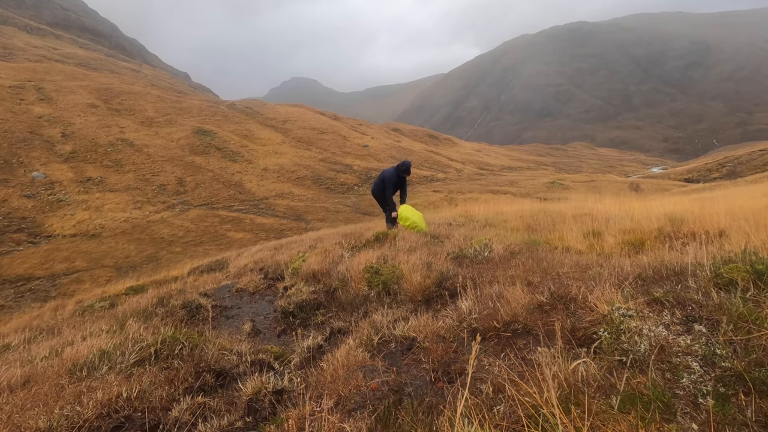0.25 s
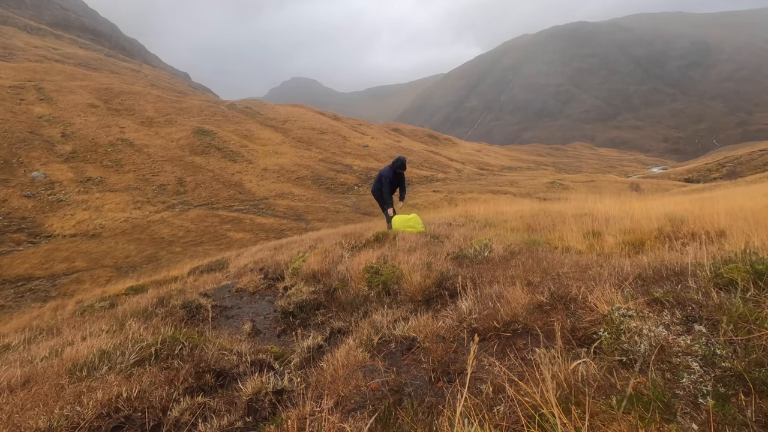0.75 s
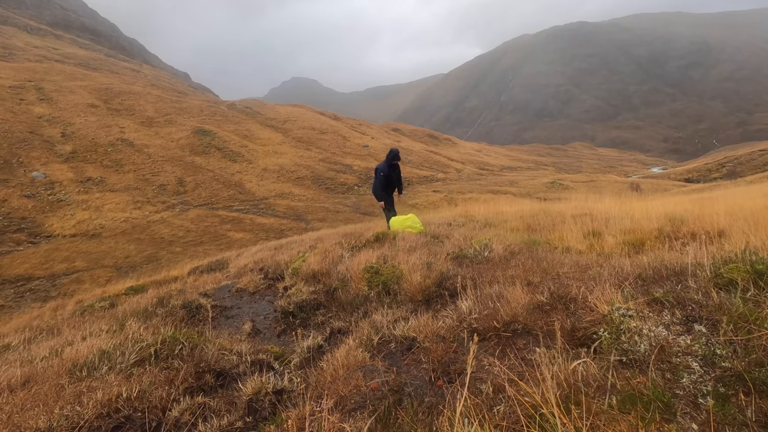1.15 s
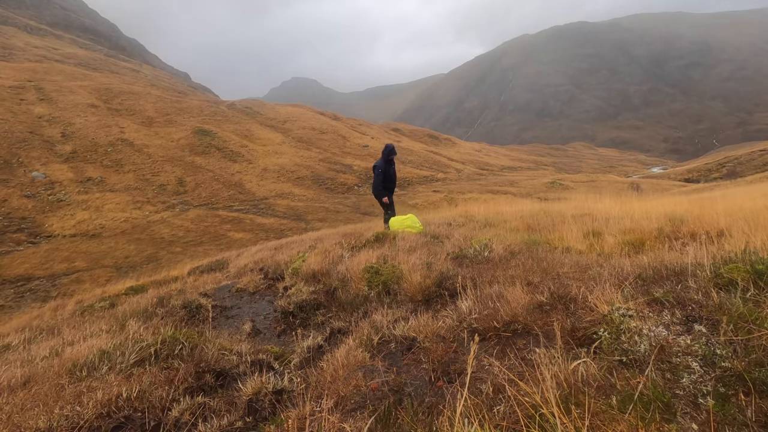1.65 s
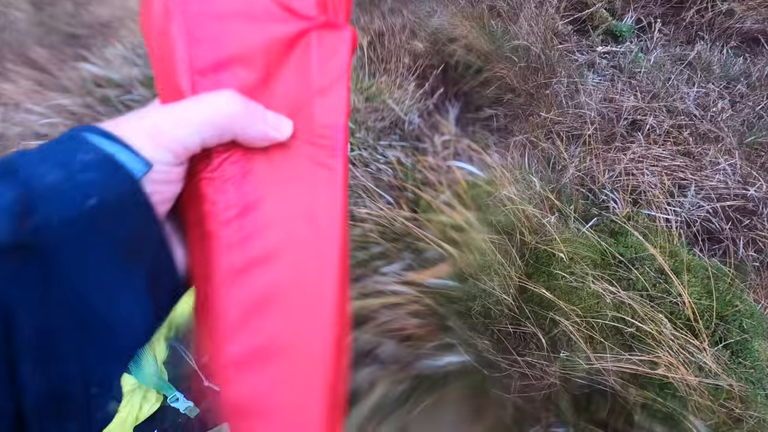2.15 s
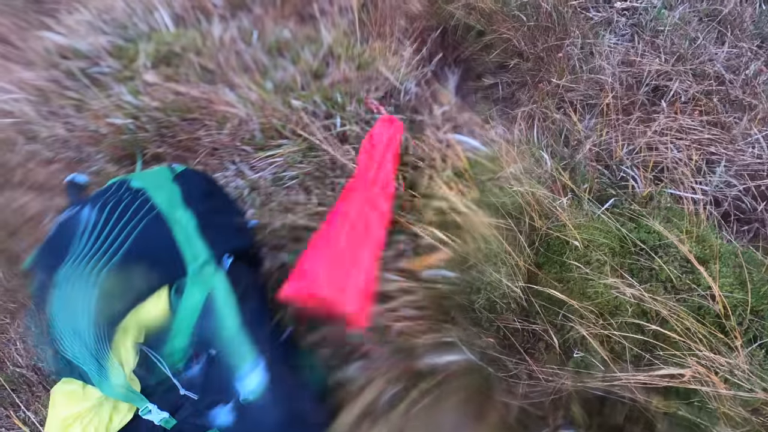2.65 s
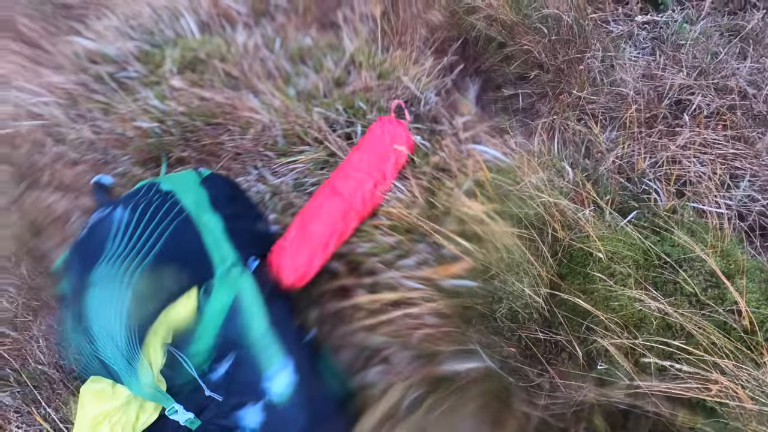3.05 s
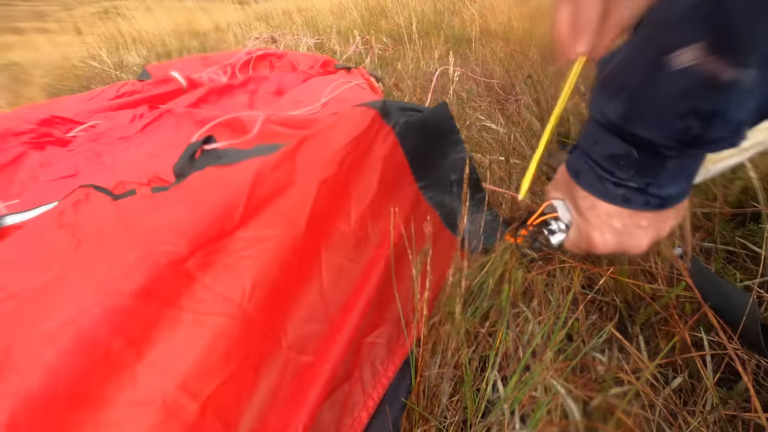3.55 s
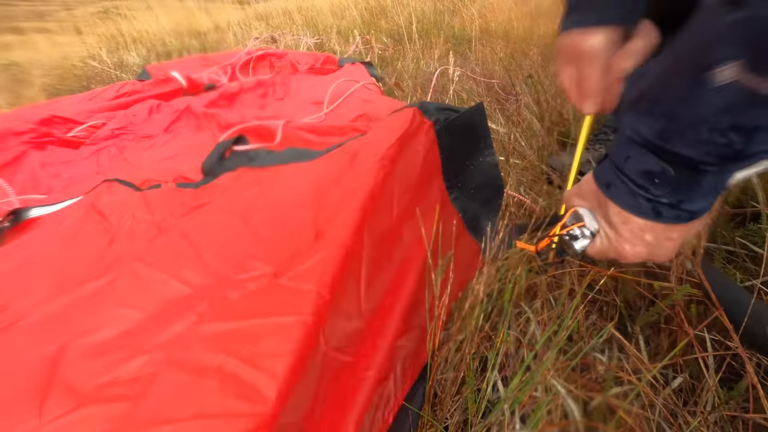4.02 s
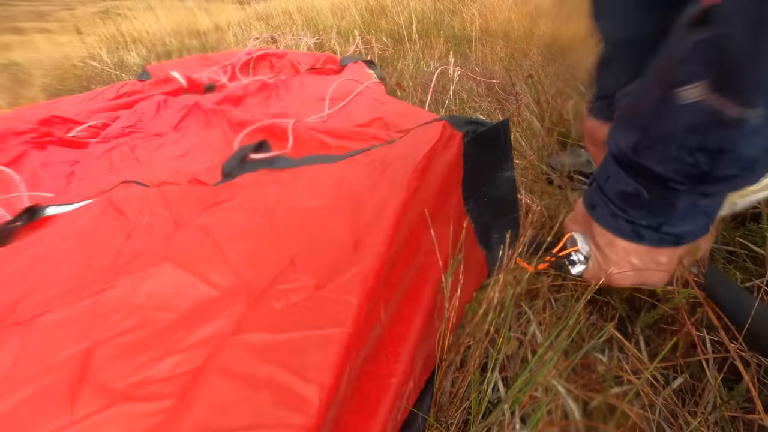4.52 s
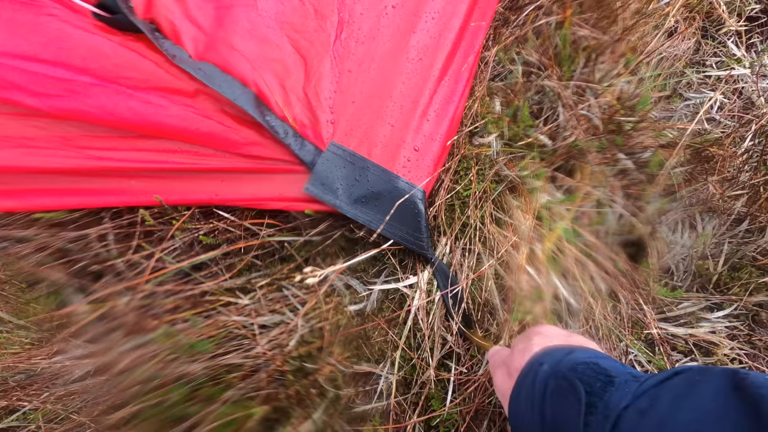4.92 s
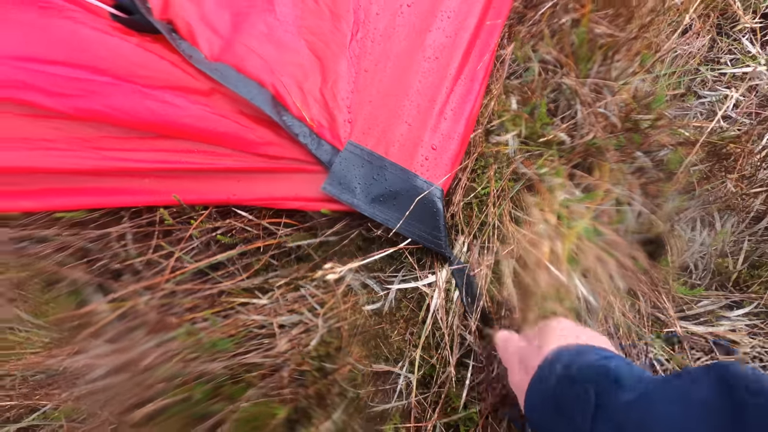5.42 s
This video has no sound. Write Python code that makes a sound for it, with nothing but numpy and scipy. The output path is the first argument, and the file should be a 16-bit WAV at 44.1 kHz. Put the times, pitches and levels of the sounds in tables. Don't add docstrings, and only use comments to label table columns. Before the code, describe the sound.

Gusty wind rumbles against the microphone on an open grassy hillside, then a pole bag drops with a crackling clatter and nylon fabric flaps and snaps.

```python
import sys
import numpy as np
from scipy import signal
from scipy.fft import rfft, irfft, next_fast_len
from scipy.io import wavfile
from scipy.ndimage import uniform_filter1d

SR = 44100
rng = np.random.default_rng(int(sys.argv[2]) if len(sys.argv) > 2 else 0)


def boost(x):
    u = np.asarray(x, float) / 20
    return 10 ** u


def output_pcm(signal):
    pcm = np.clip(np.atleast_2d(signal).T, -1, 1) * 32767
    wavfile.write(sys.argv[1], SR, np.round(pcm).astype(np.int16))


N = 250047
GRASSLAND, BAG_PLACE, SHEET_PLACE, HEM_PLACE = range(4)


def rms_one(x):
    return x / np.sqrt(np.mean(x ** 2) + 1e-20)


def colour(x, *spectra):
    size = next_fast_len(x.shape[-1] + 8192)
    log_hz = np.log(np.maximum(np.arange(size // 2 + 1) * SR / size, 1))
    level_db = 0
    for spectrum in spectra:
        hz, db = np.transpose(spectrum)
        level_db = level_db + np.interp(log_hz, np.log(hz), db)
    cepstrum = irfft(np.log(boost(level_db)), size)
    cepstrum[1:size // 2] *= 2
    cepstrum[size // 2 + 1:] = 0
    response = np.exp(rfft(cepstrum))
    return irfft(rfft(x, size) * response, size)[..., :x.shape[-1]]


def drift(size, rate_hz):
    r, run_in = np.exp(-2 * np.pi * rate_hz / SR), SR // 4
    noise = rng.standard_normal(size + run_in)
    return rms_one(signal.lfilter([1], [1, -2 * r, r * r], noise)[run_in:])


def ring(clicks, hz, t60):
    r, w = boost(-60 / (t60 * SR)), 2 * np.pi * min(hz, .45 * SR) / SR
    return signal.lfilter([0, np.sin(w)], [1, -2 * r * np.cos(w), r * r], clicks + 1e-18)


def even(x, seconds):
    power = uniform_filter1d(np.mean(x, axis=0) ** 2, int(seconds * SR))
    return x / np.sqrt(power + .05)


# f/Hz, level/dB
WIDE = [(60, -5), (130, -42), (290, -15.5), (640, -11), (1410, -9.5), (3100, -8), (6820, -0.5), (15000, 2)]
# f/Hz, level/dB
NARROW = [(60, -90), (1500, -52), (4000, -41), (6000, -24), (10000, -19), (11000, -45)]
WIDTHS = [NARROW, NARROW, WIDE, NARROW]


def stereo(pair, spectrum, width):
    mid, side = colour(pair[0], spectrum), colour(pair[1], spectrum, width)
    return np.array([mid + side, mid - side]) / np.sqrt(np.mean(mid ** 2))


# t/s, thump level/dB, roar level/dB
EDDIES = [(0.04, 11.5, -0.5), (0.19, 3.5, 2), (0.28, 4.5, -0.5), (0.38, 7.5, 2), (0.62, 3, -1),
          (0.77, 4.5, -1), (0.92, -1, -2.5), (1.1, 3.5, -0.5), (1.27, 11.5, 0.5), (1.55, 13, -0.5),
          (1.86, 11.5, 1.5), (2.05, -13, 0), (2.23, 0, 2.5), (2.33, -1, 2.5), (2.42, -3, 5), (2.52, -1, 1),
          (2.65, -19, 4.5), (3.12, 15, -2), (3.29, 7.5, 0), (3.6, -1, 2.5), (3.82, 5.5, 0), (3.92, 2, 1.5),
          (4.0, 8.5, 1), (4.12, 1.5, -0.5), (4.3, -6, 1), (4.57, 7.5, 0.5), (4.79, 3.5, 2), (5.02, 9, 5.5),
          (5.1, 1.5, 0.5), (5.18, 10.5, 4.5), (5.3, -2, 0.5), (5.4, 4, 3), (5.53, 8.5, 2.5)]


def eddies(t):
    s, thump_db, roar_db = np.transpose(EDDIES)
    half_length_s, coarse = 0.044, t[::64]
    bells = np.exp(-((coarse[:, None] - s) / half_length_s) ** 2 / 2)
    return np.interp(t, coarse, bells @ thump_db), np.interp(t, coarse, bells @ roar_db)


# f/Hz, level/dB per Hz
BUFFET = [(7.1, -52), (12, 6.5), (38, 6.5), (110, -11.5), (140, -15), (240, -120)]
# f/Hz, level/dB per Hz
ROAR = [
    [(35, -44), (60, -3.5), (113, -7), (161, -5.5), (385, -15), (900, -29.5), (1170, -83), (1980, -120)],
    [(35, -35), (60, 1.5), (188, -4.5), (307, -14.5), (380, -16), (900, -25), (1170, -48), (1980, -120)],
    [(35, -19), (60, 0.5), (178, -6.5), (317, -15.5), (461, -26), (900, -30), (1170, -37), (1980, -120)],
    [(35, -12.5), (60, -17.5), (91, -7.5), (585, -27), (709, -42), (900, -37), (1170, -48), (1980, -120)],
]
# buffeting level/dB, roar level/dB, dull hiss level/dB, sharp hiss level/dB
CALM = [
    (-40, -39.5, -43.5, -54.5),
    (-42.5, -37.5, -47, -56.5),
    (-37, -36.5, -44, -48),
    (-31, -38.5, -43, -54.5),
]


def wind(t, place):
    thump_db, surge_db = eddies(t)
    buffet_db, roar_db = CALM[place][:2]
    run_in = SR // 4
    low, high = rng.standard_normal((2, 2, len(t) + run_in))
    buffet = even(stereo(low, BUFFET, WIDTHS[place]), 0.25)[:, run_in:]
    roar = even(stereo(high, ROAR[place], WIDTHS[place]), 0.0635)[:, run_in:]
    deep = signal.sosfiltfilt(signal.butter(1, 150, fs=SR, output="sos"), roar)
    roar = roar + deep * (boost(0.32 * thump_db - 1.0) - 1)
    return boost(buffet_db + thump_db) * buffet + boost(roar_db + surge_db + 5.5) * roar


# start t/s, hold t/s, sharp level/dB, dull level/dB
CRUMPLES = [(2.185, 0.074, -57, -44), (2.293, 0.066, -45, -41), (2.395, 0.035, -42.5, -40.5),
            (2.577, 0.017, -44, -43), (2.612, .008, -38, -37), (2.616, 0.014, -30, -29),
            (2.666, 0.011, -27, -55), (2.722, 0.011, -42, -60), (2.758, 0.013, -39.5, -42.5),
            (2.83, 0.021, -50, -51), (2.9, 0.05, -39, -42.5), (2.952, 0.015, -25.5, -48),
            (3.018, 0.013, -37.5, -47), (3.056, 0.026, -48.5, -60), (3.11, 0.016, -53, -62),
            (3.243, .03, -54, -48), (3.294, 0.063, -42.5, -39), (3.397, 0.16, -43.5, -39.5),
            (3.589, 0.098, -45, -41.5), (3.72, 0.043, -54, -49), (3.785, 0.074, -45, -41),
            (4.076, 0.11, -55, -46), (4.225, 0.18, -50.5, -47.5), (4.414, 0.066, -47, -43.5),
            (4.715, .04, -48, -61), (4.78, 0.24, -47.5, -44.5), (4.998, 0.086, -49, -40.5),
            (5.137, 0.1, -55.5, -48), (5.247, 0.094, -49, -44.5), (5.39, 0.12, -50.5, -40.5),
            (5.55, 0.15, -55, -51)]


def crumpling(t):
    swell_db_per_s, fade_db_per_s = 523, 324
    power = np.zeros((2, len(t)))
    for s, hold_s, sharp_db, dull_db in CRUMPLES:
        if t[0] <= s <= t[-1]:
            swell_db = np.minimum(swell_db_per_s * (t - s), 0)
            fade_db = fade_db_per_s * np.maximum(t - s - hold_s, 0)
            power += boost(2 * (swell_db - fade_db + np.array([[dull_db], [sharp_db]])))
    return np.sqrt(power)


def grain(clicks, hz):
    click = np.arange(400) == 0
    shape = ring(ring(click, hz, 3.0 / hz), hz, 3.0 / hz)
    shape = shape * np.sqrt(hz / np.sum(shape ** 2))
    return signal.oaconvolve(clicks, [shape])[:, :clicks.shape[1]]


# f/Hz, level/dB per Hz
GRASS = [(290, -12), (500, -12.5), (594, -20.5), (839, -16.5), (914, -17.5), (1010, -14), (1800, -15.5),
         (2570, -19.5), (2800, -20), (4070, -19), (7450, -36.5), (8480, -35.5), (12900, -56), (14200, -68)]
# f/Hz, level/dB per Hz
BAG = [(290, -37), (500, -17.5), (1120, -7.5), (1370, -9), (2500, -2), (3200, -3), (3590, 2.5), (4850, -1),
       (8300, -10), (9800, -17.5), (12200, -22), (15600, -43)]
# f/Hz, level/dB per Hz
TENT = [(290, -41.5), (500, 0), (569, -5), (612, -1), (851, -5), (955, 0), (1470, 2), (3200, -2),
        (7690, -16.5), (12400, -34), (15600, -54)]
# f/Hz, level/dB per Hz
HEM = [(290, -34), (500, -22), (706, -1.5), (915, -8), (1540, -5.5), (2430, -11), (2810, -9.5),
       (3800, -12.5), (6110, -13.5), (12500, -32.5), (15600, -52)]
# crackle rate/(1/s), crackle share level/dB, size spread/dB, flutter/dB,
# split of dull and sharp f/Hz
GRAIN = [
    (20, -30, 23, 0.2, 2910),
    (2000, -7.5, 1, 0, 1500),
    (918, -7, 4, 2.16, 3030),
    (1000, -7.5, 5.5, 2, 2820),
]
# f/Hz, level/dB
TOP_SIDE = [(10000, -45), (11500, -14), (13000, -2), (15000, -13)]
# f/Hz, level/dB
BAG_TOP_LEAN = [(9500, 0), (11000, -7), (15000, -9)]


def rustle(t, place):
    size, width, spectrum = len(t), WIDTHS[place], [GRASS, BAG, TENT, HEM][place]
    easing_db = 0.9 * (1 - t) * (place == GRASSLAND)
    calm_gain = boost(np.array(CALM[place][2:])[:, None] + easing_db)
    dull, sharp = np.hypot(calm_gain, crumpling(t))
    per_s, share_db, spread_db, flutter_db, split_hz = GRAIN[place]

    shared = drift(size, 16.0)
    born = rng.random(size) < per_s * boost(3.5 * shared) / SR
    heights = boost(spread_db * np.minimum(rng.exponential(1, size), 2.3))
    clicks = born * heights * rng.choice([-1, 1], size)
    clicks = clicks * np.array([np.ones(size), rng.standard_normal(size)])
    pitches, dealt = np.geomspace(800, 14000, 14), rng.integers(0, 14, size)
    crackle = sum(grain(clicks * (dealt == k), hz) * min(1, 3000 / hz) for k, hz in enumerate(pitches))

    hiss = rng.standard_normal((2, size))
    if place != SHEET_PLACE:
        crackle[1] *= 0
        hiss[1] *= drift(size, 4.) > .4
    sound = stereo(hiss + boost(share_db) * rms_one(crackle), spectrum, width)
    if place != SHEET_PLACE:
        sound += stereo([hiss[0], rng.standard_normal(size)], spectrum, TOP_SIDE)
        sound -= stereo([hiss[0], 0 * t], spectrum, TOP_SIDE)

    out = 0
    for kind, gain in ("low", dull), ("high", sharp):
        part = signal.sosfilt(signal.butter(3, split_hz, kind, fs=SR, output="sos"), sound)
        flutter = boost(flutter_db * (0.056 * shared + drift(size, 81.0)))
        out = out + gain * rms_one(even(rms_one(flutter * part), 0.077))
    if place == BAG_PLACE:
        out[0] = colour(out[0], BAG_TOP_LEAN)
    return out


# t/s, peak level/dB
TICKS = [
    (0.5044, -60),
    (0.7664, -60),
    (0.8829, -49),
    (2.1695, -46),
    (3.2385, -50),
]


def ticks():
    out = np.zeros(N)
    for s, peak_db in TICKS:
        out[round(s * SR)] = boost(peak_db + 13.0)
    return signal.sosfilt(signal.butter(2, [5000, 14000], "band", fs=SR, output="sos"), out)


def burst(decay_s, spectrum, treble_db):
    age = np.arange(2000) / SR / decay_s
    puff = rng.standard_normal(2000) * (1 - np.exp(-age / 0.23)) * np.exp(-age)
    tilt = [(1300, -.6 * max(treble_db, 0)), (2500, 0.004), (4500, 0), (8000, treble_db)]
    puff = colour(puff, spectrum, tilt)
    return puff / np.abs(puff).max()


# f/Hz, level/dB, decay t60/s
POLES = [(1120, -27, 0.05), (1730, -21, 0.14), (2450, -6, 0.066), (3604, 2.5, 0.02), (4250, -6, 0.023),
         (4610, 1, 0.024), (5030, 1.5, 0.035), (5760, -8, 0.037), (6500, -13, .04), (8260, -4.5, 0.038)]


def knocks(rows, jostling):
    s, peak_db, favoured_hz, treble_db = np.transpose(rows)
    at, out = np.round(s * SR).astype(int), jostling.copy()
    strengths_db = rng.normal(0, 3.8, (len(at), len(POLES)))
    for k, (hz, level_db, t60) in enumerate(POLES):
        near_db = 12.8 * np.exp(-(np.log(hz / favoured_hz) / 0.074) ** 2)
        clicks = np.zeros(N)
        clicks[at] = boost(peak_db + level_db + near_db - 22.5 + strengths_db[:, k])
        out += ring(clicks, hz, t60)
    out = signal.sosfilt(signal.butter(3, 8500, fs=SR, output="sos"), out)
    crush_s = 0.7 * 0.0058
    for i, knock_db, cloth_db in zip(at, peak_db, treble_db):
        crush_db = knock_db - 3.5 + .4 * min(cloth_db + 25.0, 0)
        out[i:i + 2000] += boost(crush_db) * burst(crush_s, BAG, cloth_db + 19.5)
    return out


def rattle():
    a, b = (round(s * SR) for s in CUTS_S[1:3])
    effort = np.zeros(N)
    effort[a:b] = crumpling(np.arange(a, b) / SR)[1]
    born = rng.random(N) < 700 / SR
    sizes = born * effort * boost(2.6 * np.minimum(rng.exponential(1, N), 2))
    dealt = rng.integers(0, len(POLES), N)
    out = np.zeros(N)
    for k, (hz, level_db, t60) in enumerate(POLES):
        out += boost(level_db - 6.0) * ring(sizes * (dealt == k), hz, 0.39 * t60)
    return out


# t/s, peak level/dB, favoured f/Hz, cloth treble level/dB
KNOCKS = [(2.2742, -25, 2490, -30), (2.3157, -19, 3600, -31), (2.354, -30, 2360, -14),
          (2.3977, -15.5, 3600, -24.5), (2.4225, -29, 3450, -28), (2.6118, -11, 3880, -17),
          (2.6222, -4.5, 4640, -16.5), (2.6355, -8, 4800, -20), (2.6497, -5.5, 5740, -18),
          (2.6709, -8.5, 4580, -21), (2.692, -24, 4980, -9), (2.7417, -18.5, 3590, -21),
          (2.756, -23, 2440, -26), (2.766, -20, 2450, -23), (2.8046, -26.5, 4780, -30),
          (2.848, -30.5, 3580, -25), (2.9002, -28, 4730, -18), (2.9073, -20.5, 4800, -17),
          (2.9502, -8.5, 4600, -11), (2.9523, -8, 3670, -17), (2.9679, -6, 3870, -9),
          (3.0158, -13.5, 4210, -16), (3.072, -27, 5200, -26), (3.1008, -24.5, 8260, -16),
          (3.1188, -29, 3780, -27), (3.1312, -27, 4700, -24)]
# t/s, peak level/dB, favoured f/Hz, cloth treble level/dB
MORE_KNOCKS = [(2.6185, -14, 5030, -9), (2.627, -15, 2450, -14), (2.631, -9, 8260, -18),
               (2.6385, -12, 4250, -18), (2.6745, -19, 2450, -16), (2.76, -26, 1120, -24),
               (2.642, -16, 3604, -19), (2.658, -20, 4610, -17), (2.68, -25, 3604, -14),
               (2.701, -30, 5030, -19), (2.726, -25, 4610, -16), (2.887, -31, 2450, -16),
               (2.921, -26, 4610, -25), (2.934, -17, 2450, -25), (2.939, -18, 1730, -20),
               (2.957, -18, 3604, -11), (2.982, -21, 4250, -13), (2.992, -26, 3604, -18),
               (3.01, -18, 5760, -16), (3.025, -22, 8260, -9), (3.033, -31, 4610, -19),
               (3.0582, -26, 5030, -21), (3.209, -49, 5760, -16)]
# t/s, f/Hz, level/dB, decay t60/s
PING = [(2.624, 1120, -19.5, 0.11), (2.752, 2450, -29, 0.22), (2.8065, 4800, -36, 0.065),
        (2.8065, 7740, -37, .05), (2.806, 10800, -43, 0.056), (2.8065, 13200, -62, .05)]


def poles():
    out = knocks(KNOCKS, rattle()) + knocks(MORE_KNOCKS, np.zeros(N))
    t = np.arange(N) / SR
    for ping_s, hz, level_db, t60 in PING:
        push = boost(level_db) * np.exp(-((t - ping_s) * hz / 0.44) ** 2)
        out += ring(push, hz, t60) * hz / 9000
    return np.array([colour(out, BAG_TOP_LEAN), out])


# t/s, peak level/dB
THUDS = [
    (2.328, -25),
    (2.617, -25.5),
]


def thuds():
    out, age = np.zeros(N), np.arange(4000) / SR
    for s, peak_db in THUDS:
        push = rng.standard_normal(4000) * age / .008 * np.exp(1 - age / 0.0062)
        push = signal.sosfilt(signal.butter(2, [140, 900], "band", fs=SR, output="sos"), push)
        i = round(s * SR)
        out[i:i + 4000] += boost(peak_db) * push / np.abs(push).max()
    return out


# f/Hz, level/dB
LEAN = [(60, -3), (150, -8), (380, 10.5), (950, 1.5), (2380, 4.5), (5980, -1), (15000, -3)]


def lean_left(t, air, cloth):
    hz, lean_db = np.transpose(LEAN)
    left, right = (colour(x, np.transpose([hz, sign * lean_db / 2])) for x, sign in zip(cloth, (1, -1)))
    half_db = (3.5 + 1.1 * eddies(t)[0]) / 2
    low = signal.sosfiltfilt(signal.butter(1, 110, fs=SR, output="sos"), air)
    return air + low * (boost([half_db, -half_db]) - 1), np.array([left, right])


SHEET_PAN_DB = 4
# t/s, peak level/dB, centre f/Hz, treble level/dB
SNAPS = [(3.293, -22.5, 1810, -25), (3.3331, -19.5, 2000, -24), (3.3983, -22, 1640, -29),
         (3.4219, -19, 2390, -27), (3.469, -29, 1760, -22), (3.482, -17, 1850, -32),
         (3.5428, -23, 2080, -31), (3.6277, -23, 1230, -18), (3.6656, -20, 1300, -18),
         (3.7812, -24, 2020, -30), (3.8162, -28, 931, -24), (3.8294, -21.5, 1730, -30),
         (3.8541, -20, 2000, -22), (3.8854, -19.5, 1410, -33), (3.9401, -22, 2170, -21),
         (4.0663, -20, 2340, -20), (4.122, -22, 2180, -26), (4.14, -25, 1620, -28),
         (4.1736, -23, 1470, -31), (4.2408, -22.5, 1350, -21), (4.3294, -20, 1560, -29),
         (4.429, -24, 1690, -28), (4.4713, -20.5, 1770, -38), (4.526, -25, 1320, -27),
         (4.6241, -20.5, 1460, -29), (4.707, -25.5, 2150, -34), (4.793, -22, 2120, -23),
         (4.8268, -23, 1120, -18), (4.8918, -14.5, 2030, -33), (4.9282, -23.5, 1150, -24)]
# t/s, peak level/dB, centre f/Hz, treble level/dB
HEM_SNAPS = [(5, -22, 1160, -29), (5.0449, -30, 1536, -27), (5.062, -23, 1650, -16),
             (5.196, -32, 1200, -30), (5.2684, -26, 1100, -21), (5.3247, -27, 2180, -22),
             (5.3938, -18, 1720, -23.5), (5.4835, -25, 1710, -29), (5.503, -25, 1280, -33),
             (5.542, -22.5, 1300, -27), (5.5914, -27, 1140, -19), (5.6552, -23.5, 1640, -23)]


def snaps():
    out = np.zeros((2, N + 2000))
    for s, peak_db, hz, treble_db in SNAPS + HEM_SNAPS:
        pan_db = SHEET_PAN_DB * (s < CUTS_S[HEM_PLACE])
        crack = signal.lfilter([1, -.8], [1], burst(.0003, TENT, treble_db + 16))
        crack /= np.abs(crack).max()
        tone = ring(crack, hz, 9.3 / hz)
        pop = signal.lfilter([1], [1, -.45], crack) + boost(-3.5) * tone / np.abs(tone).max()
        level_db = peak_db + 0.16 * (peak_db + 16.0)
        i = round((s + .0008) * SR)
        out[:, i:i + 2000] += boost(level_db + np.array([[.5], [-.5]]) * pan_db) * pop / np.abs(pop).max()
    return out[:, :N]


# t/s, peak level/dB, centre f/Hz
FOLDS = [(3.3087, -26, 2060), (3.3178, -21, 1570), (3.3357, -19, 1420), (3.3717, -26, 1400),
         (3.4114, -25, 2190), (3.4228, -23, 2390), (3.4726, -23, 2460), (3.5029, -21, 1850),
         (3.515, -18, 1350), (3.5874, -33, 1000), (3.614, -23, 1210), (3.7394, -26, 1920),
         (3.7938, -19, 1310), (3.8944, -33, 1090), (3.946, -23, 2490), (3.954, -23.5, 2550),
         (3.987, -26, 1090), (4.0138, -35, 1290), (4.0744, -25, 2310), (4.1524, -27, 1060),
         (4.2542, -20, 1520), (4.2971, -34, 1500), (4.3422, -20, 1550), (4.3834, -32, 3640),
         (4.4034, -34, 1620), (4.4516, -26, 1000), (4.4784, -21, 1660), (4.4964, -32, 1360),
         (4.5774, -42, 1140), (4.6237, -18, 1500), (4.662, -25, 2170), (4.6793, -26, 1220),
         (4.7531, -32, 1100), (4.799, -21, 1790), (4.864, -33, 2350), (4.871, -20, 1740),
         (4.9084, -27, 1190), (4.9334, -32, 1080), (4.9692, -24, 1770), (5.008, -24, 1170),
         (5.2244, -27, 1560), (5.4294, -25, 1500), (5.458, -26, 1420)]
# t/s, peak level/dB, centre f/Hz
DRY_TICKS = [(3.2415, -39, 5700), (3.2889, -39, 6690), (3.4484, -34, 6110), (3.6306, -35, 6190),
             (3.8736, -38, 5700), (4.0392, -44, 6260), (4.1061, -40, 5590), (4.1144, -37, 5740),
             (4.2238, -35, 5550), (4.2872, -41, 5810), (4.3134, -38, 5590), (4.5136, -40, 5520),
             (4.5501, -43, 6500), (4.7097, -36, 5810), (4.788, -42, 6560), (4.788, -36, 6080),
             (4.9044, -37, 5690), (4.9467, -38, 5950), (5.217, -31, 6030), (5.2686, -39, 5620),
             (5.305, -32, 5670), (5.4166, -33, 6140), (5.4694, -38, 5660), (5.5194, -44, 5660)]


def folds():
    decay_s, octaves = 0.0015, 1.1
    out, age = np.zeros((2, N)), np.arange(600) / SR
    for s, peak_db, hz in FOLDS + DRY_TICKS:
        band = np.minimum(hz * 2 ** (octaves * np.array([-.5, .7])), .4 * SR)
        puff = rng.standard_normal(600) * np.exp(-age / decay_s) * np.minimum(age / 0.00019, 1)
        puff = signal.sosfilt(signal.butter(2, band, "band", fs=SR, output="sos"), puff)
        pan_db = (SHEET_PAN_DB + 2.7 * rng.standard_normal()) * (s < CUTS_S[HEM_PLACE])
        i = round((s + .0005) * SR)
        gain = boost(peak_db - 7.0 + np.array([[.5], [-.5]]) * pan_db)
        out[:, i:i + 600] += gain * puff / np.abs(puff).max()
    return out


CUTS_S = [0, 2.172, 3.238, 4.975, 5.67]


def scene():
    out = ticks() + poles() + thuds() + snaps() + folds()
    edges = [round(s * SR) for s in CUTS_S[:-1]] + [N]
    for place in range(4):
        a, b = edges[place:place + 2]
        t = np.arange(a, b) / SR
        air, cloth = wind(t, place), rustle(t, place)
        if place == SHEET_PLACE:
            air, cloth = lean_left(t, air, cloth)
        fade = np.clip(np.minimum(t - t[0], t[-1] - t) / 0.0006, 0, 1)
        out[:, a:b] += (air + cloth) * fade
    return out


def roll_off(x):
    return signal.sosfilt(signal.butter(12, 15710, fs=SR, output="sos"), x)


def record(dry):
    mix = signal.sosfilt(signal.cheby2(14, 40, 15880, fs=SR, output="sos"), dry)
    return roll_off(mix)


dry = scene()
out = record(dry)
output_pcm(out)
```